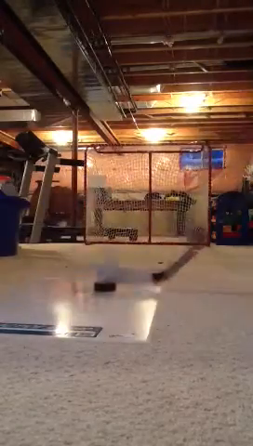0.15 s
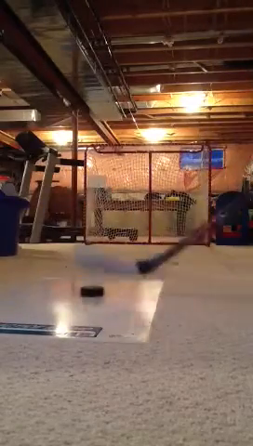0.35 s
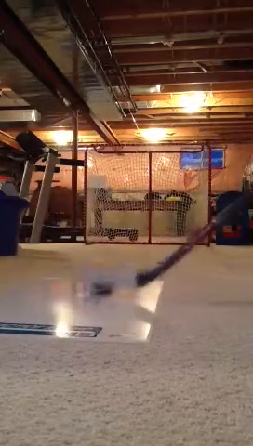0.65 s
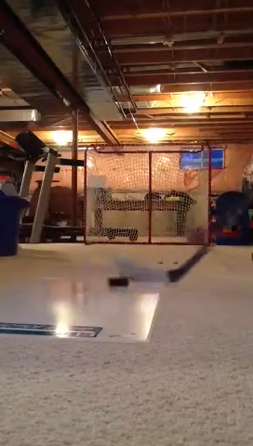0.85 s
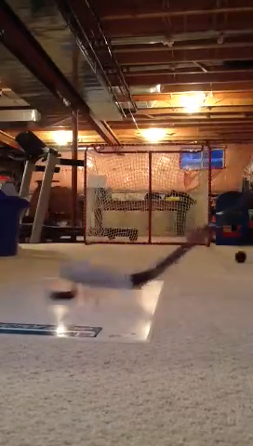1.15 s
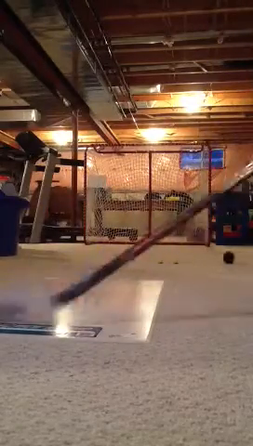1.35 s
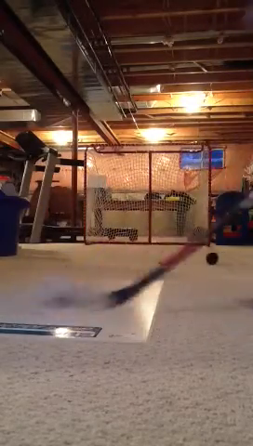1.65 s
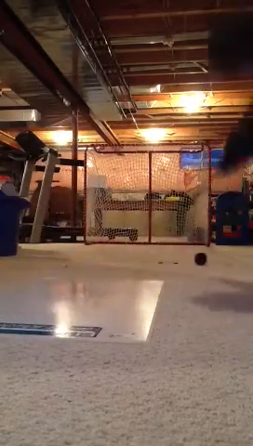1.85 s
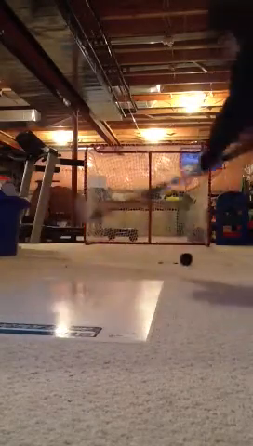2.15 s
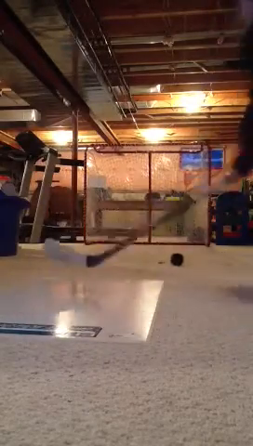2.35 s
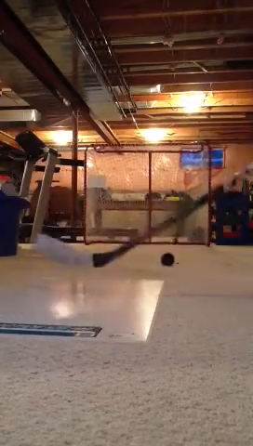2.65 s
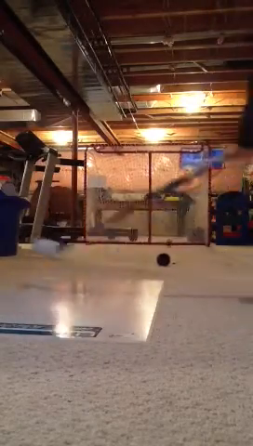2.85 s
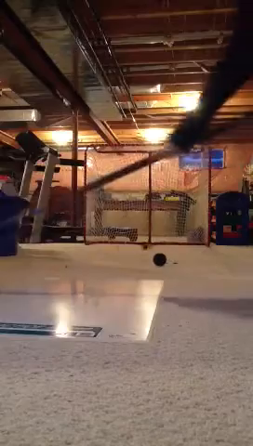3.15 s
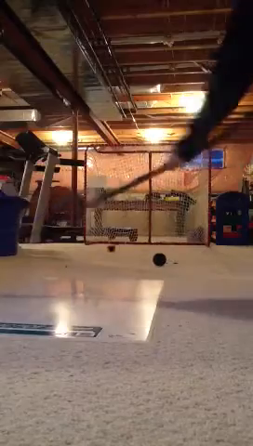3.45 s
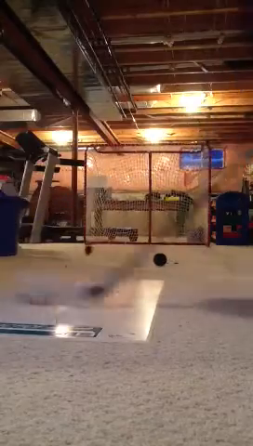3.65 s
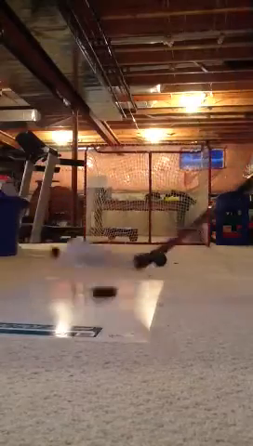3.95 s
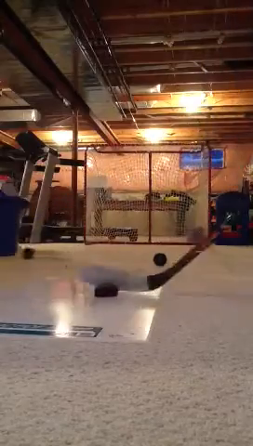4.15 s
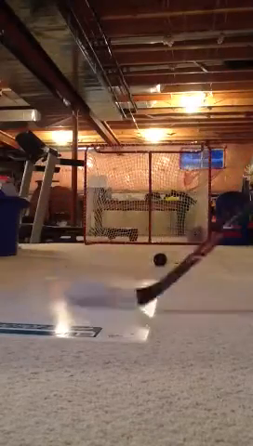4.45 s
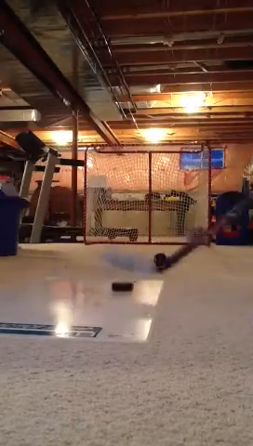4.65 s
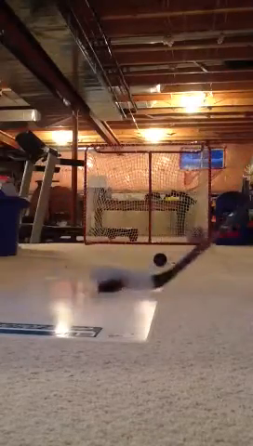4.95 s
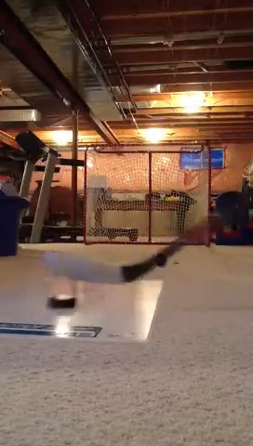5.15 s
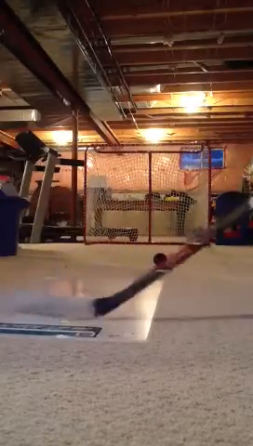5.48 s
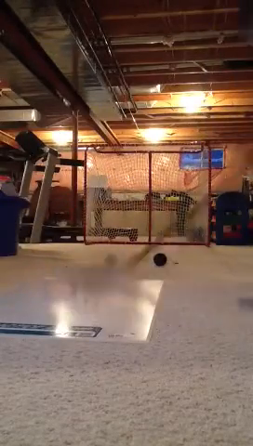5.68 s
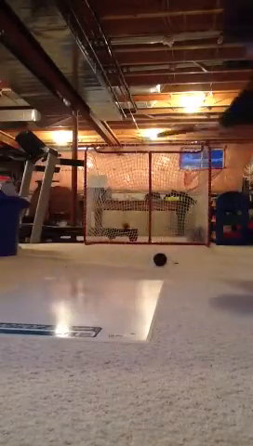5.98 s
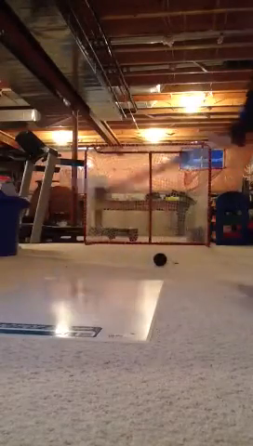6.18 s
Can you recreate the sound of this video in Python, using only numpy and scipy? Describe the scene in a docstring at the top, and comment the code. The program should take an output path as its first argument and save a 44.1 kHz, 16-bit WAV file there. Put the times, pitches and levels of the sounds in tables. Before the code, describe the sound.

Hollow slaps and sharp clacks of hockey stickhandling in a basement, with a ringing shot off the goal frame and a softer second shot.

```python
"""A hockey blade slaps a plastic shooting pad and clacks against a rubber puck: stickhandling in a
carpeted basement. The puck hisses as it slides and knocks lightly as it settles. The first shot cracks
against the steel goal frame, sets it ringing and thuds to the floor; the second thumps into the
rustling net. A short room reverb wraps the hits, and a low ventilation rumble lies underneath."""
import sys
import numpy as np
from scipy import signal
from scipy.fft import rfft, irfft
from scipy.io import wavfile
from scipy.ndimage import uniform_filter1d, map_coordinates

SR = 44100
rng = np.random.default_rng(int(sys.argv[2]) if len(sys.argv) > 2 else 0)


def wav_out(sig):
    """Save sig, one row per channel (or a flat mono array), as 16-bit PCM at SR to the path in sys.argv[1]."""
    wavfile.write(sys.argv[1], SR, np.round(np.clip(np.atleast_2d(sig).T, -1, 1) * 32767).astype(np.int16))


N = 278712

# Cue levels are relative within each layer.
# blade lands on the pad: t/s, level/dB, bass/dB, treble/dB, zing/dB, ring f/Hz
SLAP_CUES = [(0.1594, 4.5, -1.7, -6.5, 7, 328), (0.4934, -2, 5, 2.5, 9, 437), (0.859, -3, -2, -1, 3, 325),
             (1.3842, 9.5, -8, -11, -24, 280), (1.715, -5.5, 0, -7, -14.5, 450),
             (3.5253, -9.5, -4, -8, -9.5, 660), (3.5655, -9, -10.5, 4.5, -9, 451),
             (3.584, -10, -4.5, -9.5, -26, 467), (3.6478, 3, -2.3, -3.5, 0.8, 456),
             (4.0555, 3.5, -1.4, -5.5, 8, 355.8), (4.387, 6.5, 1.2, -4, 0, 322),
             (4.7573, -8, 4.5, 10.5, 0.5, 325.1), (5.2907, 6.5, -1.6, -2.5, 5.5, 481)]
# blade meets the puck, and clicks as each shot is released (1.82 s, 5.73 s): t/s, level/dB, bass/dB, treble/dB,
# ring f/Hz
CLACK_CUES = [(0.2168, 5, -5, 3, 1160), (0.5759, -3, -4.5, 5.0, 637), (0.9073, -0.7, -6.5, 6.5, 665),
              (1.8187, -3.5, -10.5, 9.5, 2110), (3.7387, 7.5, -4, 6.5, 1310), (4.12, 0, -1, 5, 960),
              (4.472, 6, -0.5, -1, 515), (4.8192, 6.5, -2.5, 6.5, 1074), (5.3973, -10.5, 7, 1, 760),
              (5.733, -11, -8, 9, 2600)]
# light knocks of puck and blade: t/s, level/dB, hardness/dB, ring f/Hz
TAP_CUES = [(0.7021, -33.5, 14, 441), (0.743, -32, 3.5, 327), (1.113, -34.5, 2.5, 475),
            (1.449, -28, -8, 281), (1.563, -31, -8, 409), (1.797, -29, -1, 765), (3.374, -41, 6.5, 575),
            (3.721, -13.5, 1, 457), (4.189, -33, 3, 554), (4.433, -21, 7, 435), (4.571, -34.5, 5, 616),
            (4.995, -30.5, 2, 495), (5.051, -35, 9, 416), (5.1, -36.5, 1, 444), (5.493, -33, -16, 450),
            (5.567, -28.5, -1.5, 438), (5.707, -35, 6, 631), (5.806, -38.5, 7, 358), (5.952, -41, -4, 362)]
# far thuds of the puck, on the floor and later into the net: t/s, level/dB, brightness/dB
THUD_CUES = [(2.395, -5, -9), (2.406, -3, 11.5), (2.464, -18.5, 28.5), (2.7, -16, -33), (2.757, -25, -25),
             (6.172, -24, 6)]
# the puck glides from a push until the blade stops it: start t/s, stop t/s, level/dB
GLIDE_CUES = [(-0.1, 0.06, -50.5), (0.217, 0.40, -61.5), (0.952, 1.384, -55), (3.717, 3.98, -54),
              (4.48, 4.757, -57), (4.837, 5.29, -50.5)]
# the blade drags the puck ever faster into a shot: peak t/s, level/dB, wind-up/s
SWEEP_CUES = [(1.702, -42.5, 0.13), (5.604, -41.5, 0.11)]
# shaken net and the player's sleeves: peak t/s, level/dB, fade/s
RUSTLE_CUES = [(2.41, -59, 0.077), (2.47, -49, 0.1), (2.80, -56, .1), (3.258, -62.5, .12),
               (3.37, -62, 0.23), (3.48, -67, 0.195), (6.095, -54.5, 0.33), (6.21, -56.5, 0.062)]

# bending modes of the blade: f/Hz, level/dB, t60/s
BLADE_MODES = [(965, -30, 0.018), (1383, -30, 0.019), (2070, -39.5, 0.026), (2760, -43.5, 0.028),
               (3034, -39.5, 0.034), (4735, -42, 0.022)]
# ringing partials of the steel frame: f/Hz, level/dB
FRAME_MODES = [(2182, 6.1), (2990, 8.5), (3308, -0.5), (3528, -4), (4317, 0), (4602, 5), (4826, 7.5),
               (5975, -7), (6451, -11), (6616, -5), (7049, -0.5), (7485, -14.5), (7716, -9), (8333, -1),
               (9245, -0.5), (9722, -15.5)]
# tone colours of the hits: f/Hz, level/dB
PAD_EQ = [(20, -14.5), (70, -18.5), (120, 0.5), (200, 17), (430, 22.5), (850, 13.5), (1300, 9.5), (1750, 5),
          (2500, 3.5), (6000, 2.5), (9000, 0.5), (14000, -7), (16000, 0)]
BLADE_EQ = [(20, -11.5), (90, -19.5), (190, 19), (400, 16), (620, 21), (820, 14.5), (1050, 15.5),
            (1350, 11.5), (1800, 4.5), (2700, 0), (5000, -3), (7000, 5), (15000, -5)]
TAP_EQ = [(40, -26.5), (180, 16), (320, 14.5), (450, 16), (700, 16), (1100, -3), (3000, -15.5),
          (12000, -33)]
CRACK_EQ = [(30, -43), (100, -8.5), (220, 13), (500, 14), (760, 24), (1050, 19.5), (1500, 19), (3000, 15),
            (6000, 21), (9000, 18), (15000, 11)]
THUD_EQ = [(40, -35), (120, 1), (210, 18), (400, 4.5), (700, 14), (1100, 0), (2200, -20), (6000, -26.5),
           (15000, -31)]
# tone colours of the noise layers: f/Hz, level/dB
SLIDE_EQ = [(150, -37), (400, 7), (1000, -10), (2000, -13), (3500, -13), (8500, -13), (10500, -4),
            (11700, -1), (13000, -8), (15500, -22.5)]
RUSTLE_EQ = [(300, -6), (1000, -2.5), (3000, -2), (9000, -2), (15000, -12)]
VENT_EQ = [(20, -37.5), (50, -46.5), (90, -14.5), (130, 0.5), (180, -7), (225, -3.5), (290, -14),
           (460, -18), (600, -19.5), (780, -20), (1100, -24.5), (2000, -30.5), (6000, -35), (13000, -36.5),
           (15500, -74)]

# base decay of the basement reverb, stretched for each tail: f/Hz, t60/s
ROOM_DECAY = [(100, 0.13), (260, 0.4), (700, 0.29), (1800, 0.32), (4800, .31), (13000, 0.23)]
# early reflections: delay/s, gain, low-pass f/Hz
WALL_ECHOES = [(.0065, 0.25, 12350), (.0089, 0.35, 1177), (0.0123, 0.32, 2176), (0.0143, .18, 900),
               (0.0179, 0.22, 1264)]
# standing waves of the basement: f/Hz, relative level/dB, t60/s
ROOM_MODES = [(190, -45.5, 0.12), (313.6, -57.5, 0.39), (435, -65.5, 0.12), (452, -49, 0.058)]
# tone colour of the diffuse tail: f/Hz, level/dB
TAIL_EQ = [(200, 3), (400, -0.5), (700, 0.5), (2500, 3), (6000, -2), (11500, 0), (14000, -2)]

ZING_LEAD_S = 0.002  # head start of the whistle on its slap


def pad_slaps():
    """The blade lands flat on the pad: a hollow thump with a sharp edge."""
    out = np.zeros(N)
    for at, db, bass_db, treble_db, zing_db, ring_hz in SLAP_CUES:
        shade = [(450, bass_db - 2.5), (1200, 0), (5000, treble_db)]
        thump = amp(db - 3) * impact(PAD_EQ, shade, ring_hz, lift_db=6.5, width=0.039)
        add(out, at, basement(thump, wet_db=-0.5, standing_db=4))
        # the whistle skims along the floor and hardly stirs the room
        whistle = amp(zing_db - 12) * pad_zing(hz=11300, bend=0.035, rise_s=0.00042, fade_s=0.0001)
        add(out, at - ZING_LEAD_S, basement(whistle, wet_db=-12.5, standing_db=-28.5))
    return out


def pad_zing(hz, bend, rise_s, fade_s):
    """Fast bending waves in the pad outrun the blow, highest first: a tiny falling whistle."""
    t = np.arange(SR // 100) / SR - ZING_LEAD_S
    pitch = hz * (1 - bend * np.tanh(t / rise_s))
    jitter = 0.31 * np.cumsum(rng.standard_normal(len(t)))
    envelope = np.exp(np.minimum(t / rise_s, -t / fade_s))
    return envelope * np.cos(2 * np.pi * np.cumsum(pitch) / SR + jitter)


def blade_clacks():
    """The stiff blade knocks the rubber puck, and clicks as each shot is released; every blow rings its bending
    modes at new strengths."""
    out = np.zeros(N)
    for at, db, bass_db, treble_db, ring_hz in CLACK_CUES:
        # rubber is too soft to pass on the top end
        shade = [(450, bass_db), (1100, 1), (2500, treble_db), (4800, treble_db - 4.5), (8000, -21.5)]
        knock = impact(BLADE_EQ, shade, ring_hz, lift_db=5, width=0.083)
        for hz, mode_db, t60 in BLADE_MODES:
            gain = amp(mode_db + 0.5 + curve_at(shade, hz) + rng.normal(0, 2.6))
            add(knock, 0, gain * mode(hz * rng.normal(1, 0.022), attack_s=0.0006, t60=t60))
        add(out, at, amp(db - 6) * basement(knock, wet_db=-3, standing_db=-7.5))
    return out


def puck_taps():
    """The puck wobbles and settles: soft contacts swell a hollow note, harder ones add a tick."""
    out = np.zeros(N)
    lead_s = 0.002  # the note starts ahead of the tick
    for at, db, hard_db, ring_hz in TAP_CUES:
        knock = mode(ring_hz, attack_s=0.0048, t60=0.044)
        shade = [(400, 7.7), (1500, hard_db + 15), (4000, hard_db + 16.5), (10000, hard_db + 22.5)]
        add(knock, lead_s, impact(TAP_EQ, shade))
        add(out, at - lead_s, basement(amp(db + 1.5) * knock, wet_db=-1.5, standing_db=0))
    return out


def goal_frame(at, crack_db, ring_db, ring_t60):
    """The shot sets the far steel frame ringing; nearly all of the crack arrives by way of the room."""
    out = np.zeros(N)
    room = reverb_tail(rise_s=0.0033, stretch=1.055)
    room[0] += 0.08  # faint direct path
    add(out, at, signal.fftconvolve(impact(CRACK_EQ, [(1000, crack_db)]), room))
    t = np.arange(SR * 3 // 5) / SR
    envelope = (1 - np.exp(-t / 0.0068)) * amp(ring_db - 60 * t / ring_t60)
    for hz, db in FRAME_MODES:
        phase = 2 * np.pi * (hz * t + rng.random())
        drift = 0.01 * np.cumsum(rng.standard_normal(len(t)))
        add(out, at, amp(db) * envelope * np.sin(phase + drift))
    return out


def puck_thuds():
    """Far, roomy thuds: the puck drops and bounces on the floor, and later thumps into the net."""
    out = np.zeros(N)
    for at, db, bright_db in THUD_CUES:
        thud = amp(db - 9) * impact(THUD_EQ, [(400, 0), (2500, bright_db)])
        add(out, at, basement(thud, wet_db=12, standing_db=-8))
    return out


def puck_slide():
    """The sliding puck makes the pad hiss in short catches, with a sheen at the pitch of its zing."""
    catches = unit_rms(amp(1.2 * wobble(160) + 2.2 * wobble(900)))
    gliding = sum(amp(db) * glide(start, stop) for start, stop, db in GLIDE_CUES)
    sweeping = sum(amp(db) * swell(at, wind_up, fall_s=0.13) for at, db, wind_up in SWEEP_CUES)
    return (gliding + sweeping) * catches * noise(SLIDE_EQ)


def glide(start, stop, rise_s=0.054, release_s=0.057, slowing_db_per_s=25.5):
    """Envelope of the hiss as the pushed puck gets going, slows steadily and is stopped."""
    t = np.arange(N) / SR
    moving = np.clip((t - start) / rise_s, 0, 1) * np.clip(1 - (t - stop) / release_s, 0, 1)
    return moving * amp(-slowing_db_per_s * np.maximum(t - start, 0))


def rustles():
    """Shaken net and sleeves rub in soft, uneven swells of noise."""
    shaking = sum(amp(db) * swell(at, rise_s=0.032, fall_s=fade) for at, db, fade in RUSTLE_CUES)
    flutter = amp(1.8 * wobble(120))
    return shaking * flutter * noise(RUSTLE_EQ)


def ventilation(level_db):
    """The ventilation lays a bed of low rumble and faint hiss, its level barely drifting."""
    drift_db = 0.8 * wobble(5)
    return amp(level_db + drift_db) * noise(VENT_EQ)


def basement(sound, wet_db, standing_db):
    """Put a sound in the room: direct path, early reflections, standing waves and diffuse tail."""
    response = amp(wet_db) * reverb_tail(rise_s=0.00029, stretch=0.89)
    t = np.arange(len(response)) / SR
    response[0] += 1
    for delay, gain, dull_hz in WALL_ECHOES:
        smear = np.exp(-2 * np.pi * dull_hz * t[:SR // 200])
        add(response, delay + rng.normal(0, 0.00021), gain * smear / smear.sum())
    for hz, db, t60 in ROOM_MODES:
        response += amp(standing_db + db - 60 * t / t60) * np.cos(2 * np.pi * hz * t)
    return signal.fftconvolve(sound, response)


def reverb_tail(rise_s, stretch):
    """A fresh diffuse tail of energy near 1: noise that dies away at its own rate in each band."""
    hz, t, bands = signal.stft(rng.standard_normal(SR * 3 // 5), SR, nperseg=256)
    t60 = stretch * curve_at(ROOM_DECAY, hz)[:, None]
    wash = signal.istft(bands * amp(-60 * t / t60), SR, nperseg=256)[1]
    onset = 1 - np.exp(-(np.arange(len(wash)) / SR / rise_s) ** 2)
    # the many paths share the energy evenly over broad bands
    bins = rfft(wash * onset, SR)
    even = bins / np.sqrt(uniform_filter1d(np.abs(bins) ** 2, size=601))
    colour = amp(curve_at(TAIL_EQ, np.fft.rfftfreq(SR, 1 / SR)))
    return irfft(even * colour)[:len(wash)]


def impact(eq, shade, ring_hz=500, lift_db=0, width=0.1, size=4096):
    """One hit: the object's colour, shaded by the blow, with a resonance set by the point of contact."""
    hz = np.fft.rfftfreq(size, 1 / SR)
    resonance = 1 + (amp(lift_db) - 1) / np.hypot(1, (hz / ring_hz - 1) / width)
    magnitude = resonance * amp(curve_at(eq, hz) + curve_at(shade, hz))
    # minimum phase packs the energy into the attack
    cepstrum = irfft(np.log(magnitude))
    cepstrum[1:size // 2] *= 2
    cepstrum[size // 2 + 1:] = 0
    return irfft(np.exp(rfft(cepstrum)))


def mode(hz, attack_s, t60):
    """A damped resonance that swells over the time of contact."""
    t = np.arange(SR // 5) / SR
    onset = 1 - np.exp(-(t / attack_s) ** 2)
    return np.sin(2 * np.pi * hz * t) * onset * amp(-60 * t / t60)


def swell(at, rise_s, fall_s):
    """An envelope that lies 20 dB down rise_s before its peak and fall_s after it."""
    t = np.arange(N) / SR - at
    return 10 ** np.minimum(t / rise_s, -t / fall_s)


def noise(eq):
    """Coloured noise of rms 1."""
    colour = amp(curve_at(eq, np.fft.rfftfreq(N, 1 / SR)))
    return unit_rms(irfft(rfft(rng.standard_normal(N)) * colour, N))


def wobble(rate):
    """Smooth random modulation through rate points a second."""
    points = rng.standard_normal(int(N * rate / SR) + 4)
    return map_coordinates(points, [np.arange(N) * rate / SR])


def curve_at(points, hz):
    """Read a breakpoint curve on a log frequency axis."""
    freqs, values = np.transpose(points)
    return np.interp(np.log(hz + 1), np.log(freqs + 1), values)


def add(track, at, sound):
    """Mix a sound into the track at a time in seconds."""
    part = track[max(round(at * SR), 0):][:len(sound)]
    part += sound[:len(part)]


def amp(db):
    """Decibels to gain."""
    return 10 ** (np.asarray(db) / 20)


def unit_rms(x):
    """Scale to rms 1."""
    return x / np.sqrt(np.mean(x ** 2) + 1e-20)


def scene():
    """The mono mix, heard from one microphone on the floor."""
    shots = goal_frame(at=2.0725, crack_db=1, ring_db=-36, ring_t60=0.33) + puck_thuds()
    handling = pad_slaps() + blade_clacks() + puck_taps() + puck_slide()
    return (handling + shots + rustles() + ventilation(level_db=-55))[None]


def record(dry):
    """The microphone rounds off the highest peaks and keeps nothing above its band limit."""
    ceiling, top_hz = 0.7, 16000
    soft = dry / (1 + np.abs(dry / ceiling) ** 4) ** (1 / 4)
    return signal.sosfilt(signal.cheby2(18, 70, top_hz, fs=SR, output="sos"), soft)


dry = scene()
out = record(dry)
wav_out(out)
```